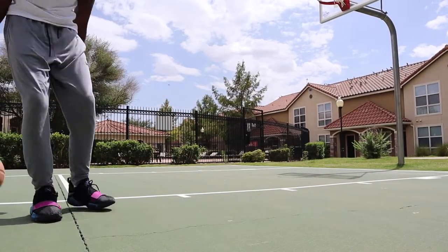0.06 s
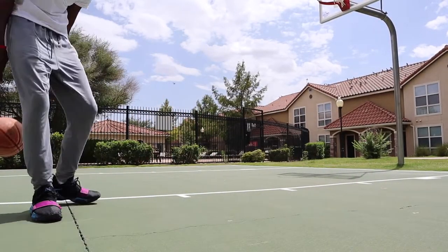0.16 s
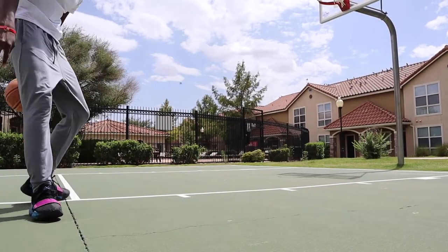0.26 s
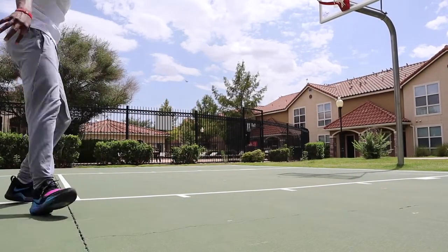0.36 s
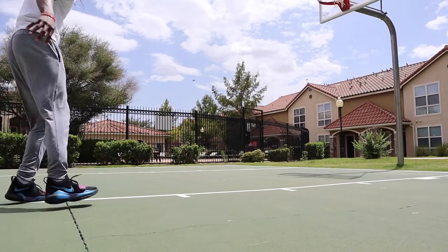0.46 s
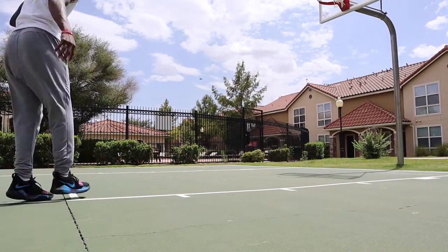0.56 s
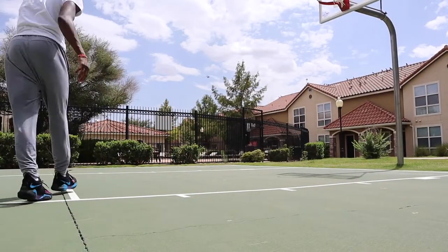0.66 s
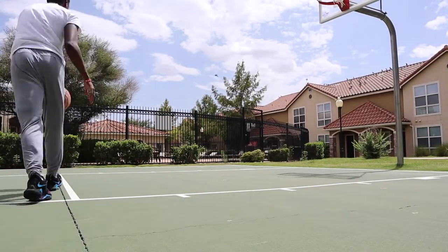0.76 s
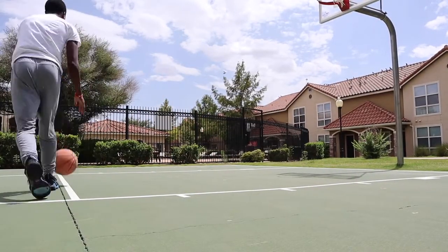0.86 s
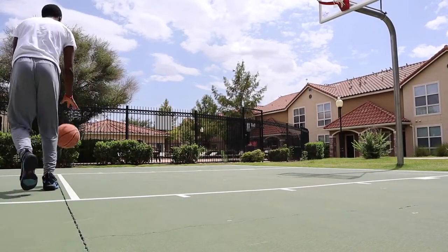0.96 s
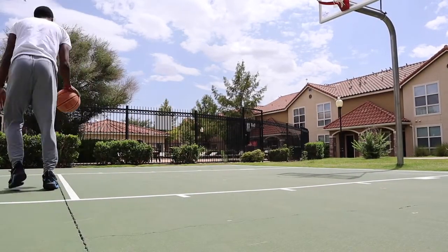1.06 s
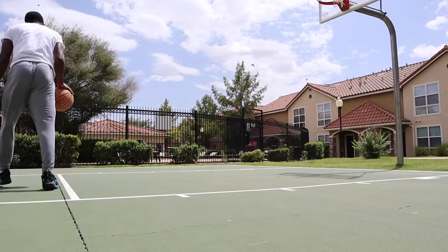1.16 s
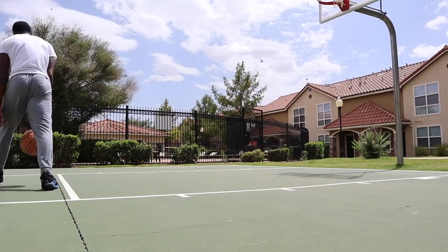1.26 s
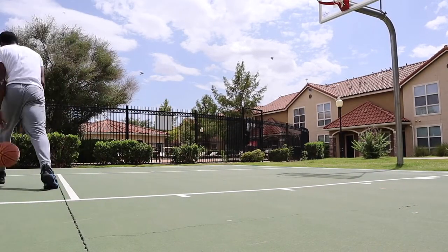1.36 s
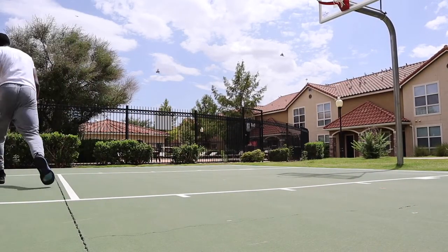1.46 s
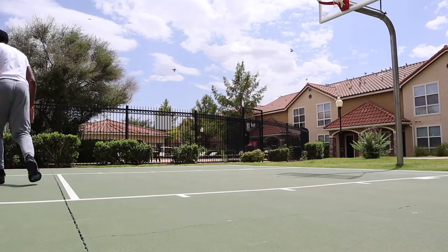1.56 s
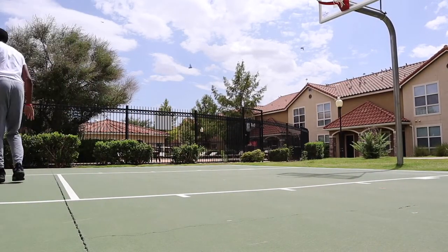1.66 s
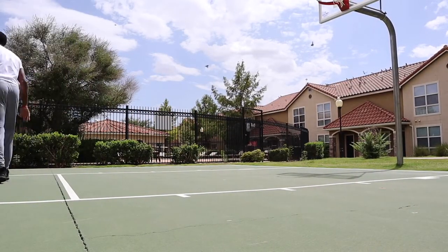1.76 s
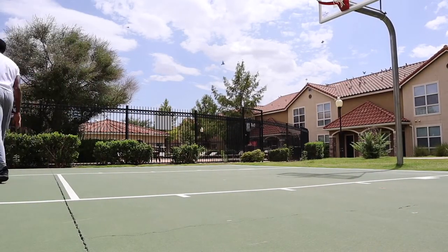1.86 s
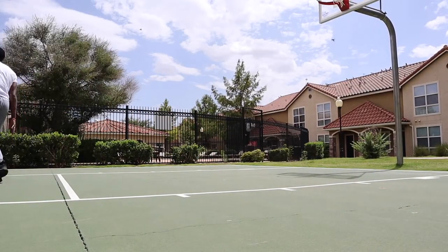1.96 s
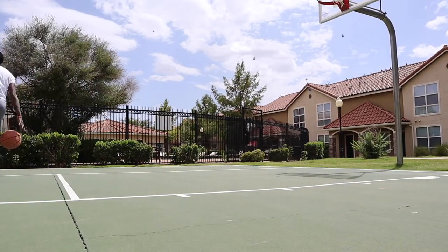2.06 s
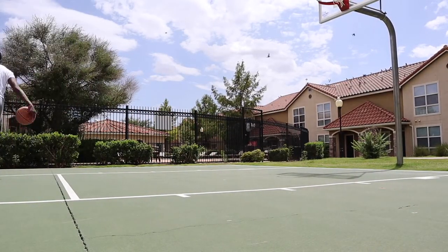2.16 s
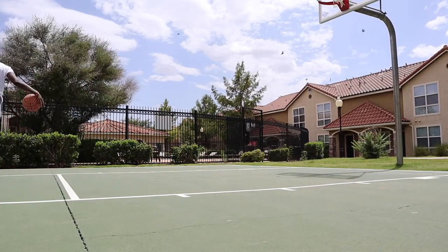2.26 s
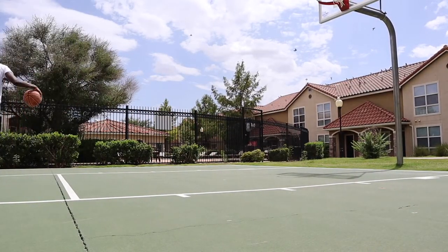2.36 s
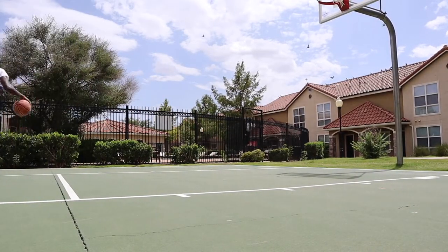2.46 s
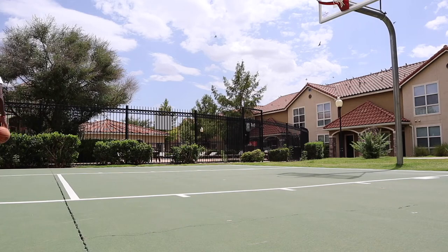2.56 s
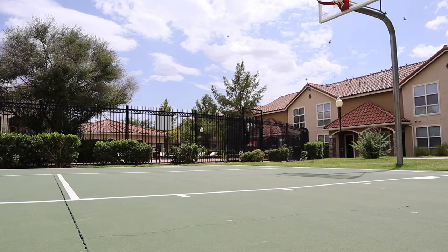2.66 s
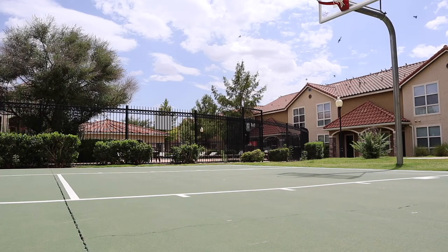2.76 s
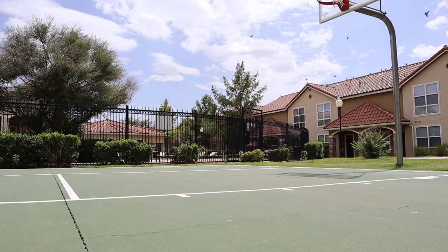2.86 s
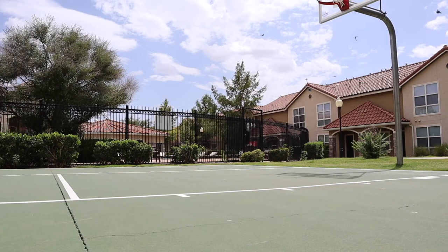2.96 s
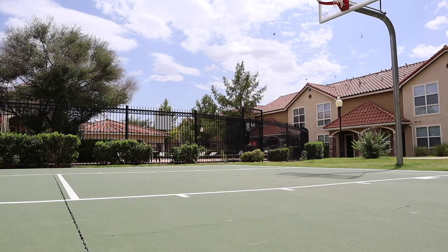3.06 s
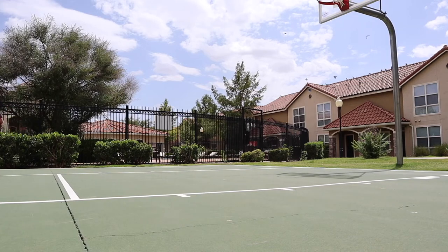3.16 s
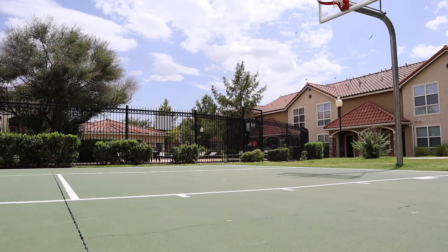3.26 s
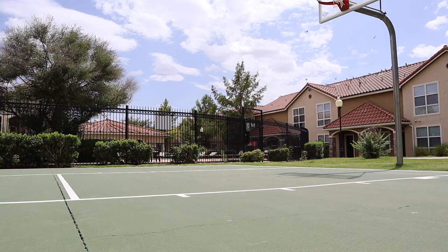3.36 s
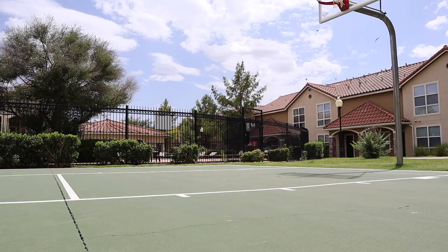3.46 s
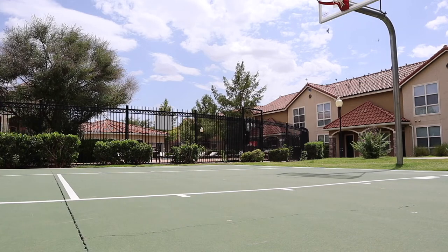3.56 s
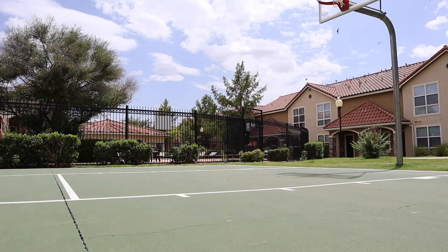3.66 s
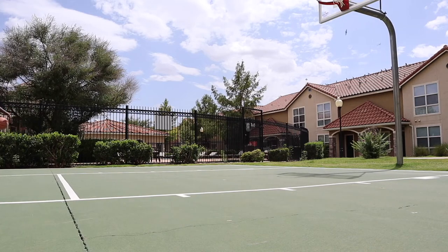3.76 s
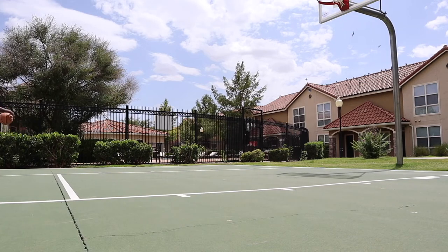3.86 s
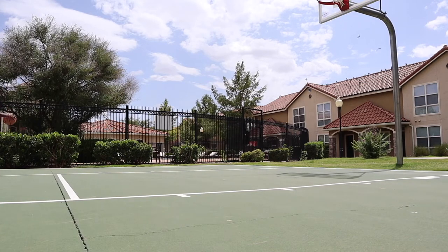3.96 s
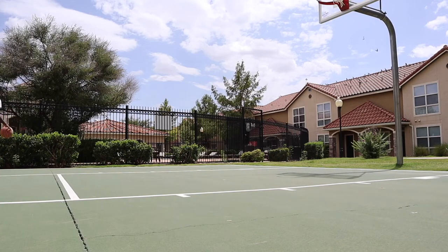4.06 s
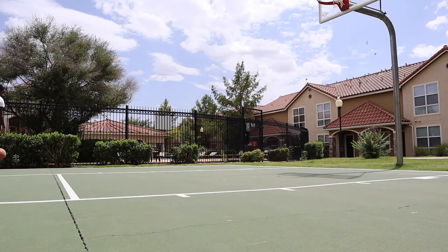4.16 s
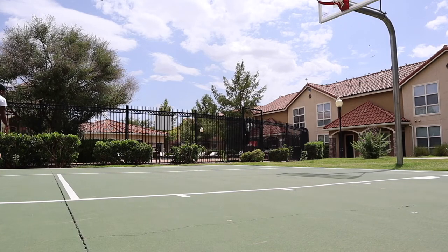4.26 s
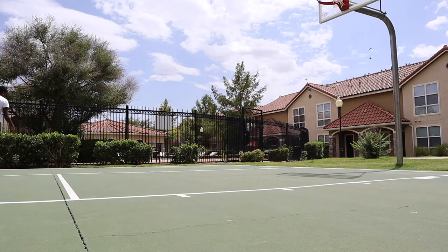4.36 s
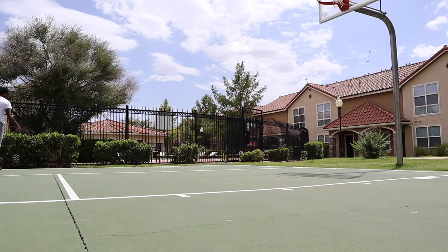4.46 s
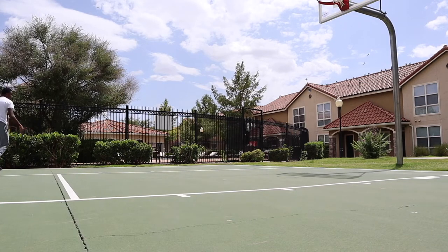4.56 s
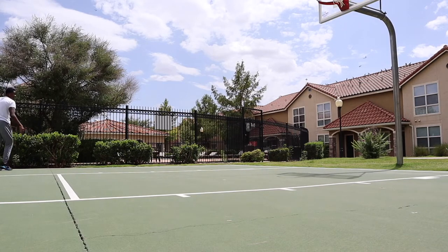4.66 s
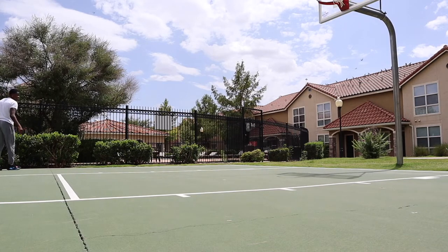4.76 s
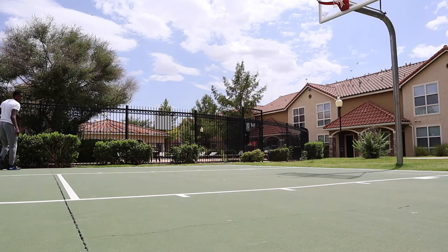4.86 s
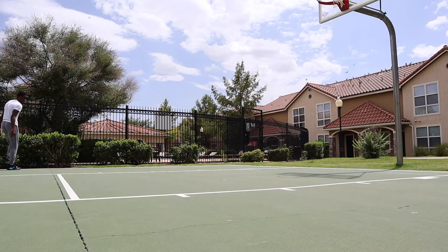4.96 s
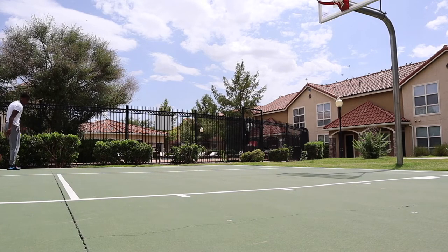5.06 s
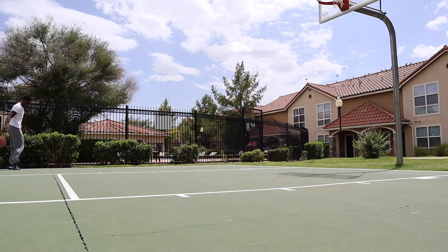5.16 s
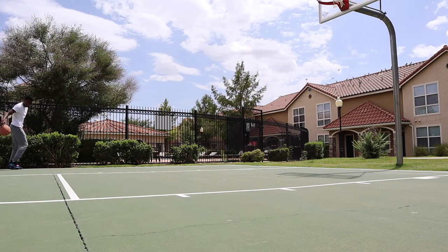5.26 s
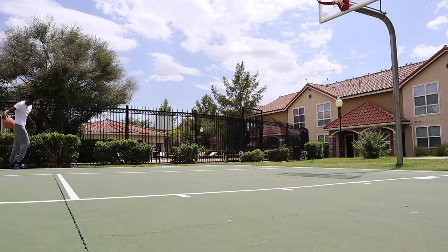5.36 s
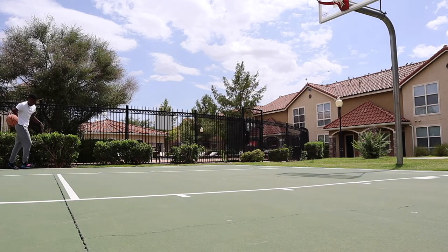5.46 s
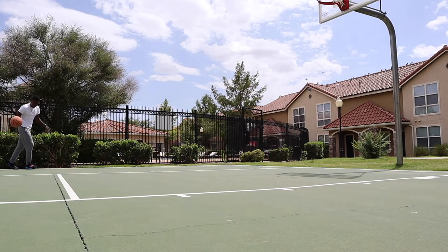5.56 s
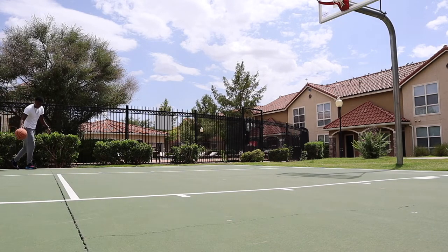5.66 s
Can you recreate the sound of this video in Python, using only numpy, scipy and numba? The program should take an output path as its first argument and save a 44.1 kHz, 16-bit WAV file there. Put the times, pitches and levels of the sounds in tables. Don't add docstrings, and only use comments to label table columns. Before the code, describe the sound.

A basketball is dribbled on an outdoor hard court, close to a small stereo camera microphone at first, then moving off. Eight sharp cracks with hollow, ringing thumps come well under a second apart, the loudest slightly clipped. Short gritty shoe scuffs fall between them, and dull echoes return from fence and houses. Cooling units hum low and waver under a bed of air and distant traffic.

```python
import sys
import numpy as np
from scipy import signal
from scipy.fft import rfft, irfft
from scipy.io import wavfile
from scipy.ndimage import uniform_filter1d, minimum_filter1d, map_coordinates
from numba import njit

SR = 44100
rng = np.random.default_rng(int(sys.argv[2]) if len(sys.argv) > 2 else 0)


def persist_wave(psi):
    counts = np.round(np.clip(psi, -1, 1) * 32767).astype(np.int16)
    wavfile.write(sys.argv[1], SR, np.atleast_2d(counts).T)


def boost_factor(decibels):
    exponent = np.asarray(decibels, float) / 20
    return 10 ** exponent


N = 252252
TIME = np.arange(N) / SR
BLOW = np.arange(1400) / SR
TAIL = np.arange(9000) / SR

# (multiple of shaft speed, level over the rush [dB])
FAN_ORDERS = [(2, 1), (10, -14), (20, -14.5), (25, -12.5), (30, -16)]
# (multiple of motor hum, level over the rush [dB])
MOTOR_HARMONICS = [(1, 5), (3, -14.5), (6, -13), (9, -15)]
# (time [s], lag [turns], strength share [0-1])
MOTOR_SLIP = [
    (0.15, 0.01, .6),
    (0.7, 0.95, .3),
    (1.75, 3.2, 0.2),
    (2.3, 3.98, .75),
    (2.78, 5, 1),
    (3.15, 5.74, 0.15),
    (4.55, 9.01, 0.8),
    (5.3, 10, 0.35),
    (5.72, 10.6, .6),
]
# (time [s], level [dB])
FAN_THROB = [(0, -30.5), (.55, -34.5), (.85, -30.5), (1.55, -34.5), (2.3, -29), (2.62, -38.5), (2.95, -28),
             (3.5, -25.5), (4.17, -35), (4.55, -25.5), (4.92, -34), (5.08, -24), (5.3, -32.5), (5.53, -21),
             (5.72, -29)]
# (frequency [Hz], density [dB per Hz])
RUSH_SPECTRUM = [(28, -23.5), (45, -7.5), (105, -5.5), (170, -5), (260, -8), (520, -11.5), (900, -14.5),
                 (1300, -12.5), (2000, -19), (3000, -23), (5000, -26.5), (8000, -34), (12000, -39),
                 (14500, -50)]
# (time [s], strength [dB], thump [Hz], air ring [Hz], brightness [dB])
BOUNCES = [
    (0.1245, 0, 231, 1254, 0),
    (0.9291, -.5, 184, 1510, 4.5),
    (1.3654, -1, 146, 1214, 6.5),
    (2.016, -2.5, 215, 1205, 1.5),
    (2.712, -3, 193, 1310, -3),
    (3.546, -3.5, 213, 1134, -3),
    (4.2709, -2, 219.5, 1790, -5.5),
    (5.0822, -4.5, 133, 980, 0.5),
]
# (ratio to the ring, level [dB], 60 dB decay [s])
AIR_MODES = [(.55, -7, 0.013), (1.002, 2, 0.016), (1.3, -1.5, 0.013), (1.65, -2.5, 0.013),
             (2.199, -6.5, 0.01), (2.85, -9.5, 0.01), (3.7, -5.5, .007), (4.6, -6.5, 0.0094)]
# (time [s], length [s], start band [Hz], end band [Hz], level [dB])
SCUFFS = [
    (0.348, 0.081, 7300, 5000, -44),
    (0.735, 0.018, 6060, 5000, -42),
    (0.795, 0.056, 11000, 6470, -41.5),
    (0.964, .04, 5000, 5200, -39),
    (2.22, .025, 10800, 10160, -50.5),
    (3.553, 0.042, 8000, 6500, -36.5),
    (3.919, 0.02, 8950, 8000, -44),
    (4.269, 0.039, 8000, 7150, -40),
    (4.772, 0.043, 11000, 9900, -63),
]
# (frequency [Hz], phase [radians])
PORT_LAG = [(60, 0), (430, 0.27), (860, 1.02), (1120, 1.5), (2580, 2), (3620, 3), (7000, 3.0), (13500, 3.2)]
# (frequency [Hz], left minus right [dB])
PORT_SHADE = [(60, 0.0), (110, 0.0), (200, 1.0), (380, 1.5), (700, 4.5), (1290, 6), (2380, 1), (4400, 4),
              (8120, 0), (15000, 1)]

SHAFT_HZ, MOTOR_HZ = 27.24, 204.7
THIRD_DB = -0.5
BLADE_DB, PAIR_DB = 5, -1.5
SWELL_DB, SWELL_HZ, SWELL_TOP_S = 1.7, 0.29, 0.9
RUSH_DB, CREEP_DB_PER_S, KNOCK_DB, RECOVER_S = -32, 0.81, -2.5, 0.82
STIFF_HZ, CONTACT_S = 200, 0.0105
TROUGH_MS, TROUGH_MS_PER_HZ = 4.8, 0.0096
DIP_DB, SLAP_DB, LIFT_DB_PER_HZ = -7.5, -8.5, -0.0331
CRACK_DB, RING_DB, RING_DB_PER_S = -1, -4, -1.06
ECHO_MS, ECHO_MS_PER_S, ECHO_DB = 46, -0.65, -12
MIC_LOW_HZ = 28.4
TREBLE_JITTER = np.repeat(rng.standard_normal((2, 32, N // 2048 + 2)), 2, axis=2)
CIRCUIT = rng.standard_normal(N)


def level(x, db):
    return x * boost_factor(db) / np.sqrt(np.mean(x ** 2))


def walk(rate):
    k = int(SR / rate)
    steps = np.repeat(rng.standard_normal(N // k + 1), k)
    return 1.274 * uniform_filter1d(uniform_filter1d(steps, k), k)[:N]


def band(x, lo_hz, hi_hz):
    return signal.sosfilt(signal.butter(2, [lo_hz, min(hi_hz, 0.45 * SR)], "band", fs=SR, output="sos"), x)


def pole(x, hz, kind):
    return signal.lfilter(*signal.butter(1, hz, kind, fs=SR), x)


def add(out, s, sound):
    i = int(s * SR)
    out[i:i + len(sound)] += sound[:N - i]


def curve(table):
    hz, value = np.transpose(table)
    return np.interp(np.log(np.fft.rfftfreq(N, 1 / SR) + 1), np.log(hz), value)


def machine_tone(hz, db):
    phase = np.cumsum(hz * (1 + 0.00054 * walk(1.984))) / SR + rng.random()
    return np.sqrt(2) * boost_factor(db + 0.8 * walk(14)) * np.sin(2 * np.pi * phase)


def rush():
    noise = irfft(rfft(rng.standard_normal(N)) * boost_factor(curve(RUSH_SPECTRUM)), N)
    return level(noise, 4.47) * boost_factor(0.5 * walk(14))


def rush_level():
    since = TIME - np.array(BOUNCES)[:, :1]
    knocks = np.sum((since > 0) * np.exp(-np.abs(since) / RECOVER_S), axis=0)
    return boost_factor(RUSH_DB + CREEP_DB_PER_S * TIME + KNOCK_DB * knocks)


def cooling_units(rush_gain):
    fan = sum(machine_tone(k * SHAFT_HZ, db) for k, db in FAN_ORDERS)
    motor = sum(machine_tone(k * MOTOR_HZ, db) for k, db in MOTOR_HARMONICS)
    s, turns, share = np.transpose(MOTOR_SLIP)
    twin = np.interp(TIME, s, share) * np.exp(2j * np.pi * np.interp(TIME, s, turns))
    pair = np.abs(1 - twin) * machine_tone(2 * MOTOR_HZ, PAIR_DB)
    swell_db = SWELL_DB * np.cos(2 * np.pi * SWELL_HZ * (TIME - SWELL_TOP_S))
    blades = machine_tone(5 * SHAFT_HZ, BLADE_DB + swell_db)
    throb_db = np.interp(TIME, *np.transpose(FAN_THROB))
    throb = machine_tone(3 * SHAFT_HZ, THIRD_DB + throb_db)
    return rush_gain * (fan + motor + blades + pair) + throb


def crack(ring_hz, ring_db, bright_db, chance):
    rings = 0
    for (ratio, db, t60), (db_luck, hz_luck) in zip(AIR_MODES, chance):
        mode = np.sin(2 * np.pi * ring_hz * ratio * (1 + 0.059 * hz_luck) * BLOW)
        rings = rings + boost_factor(db + 2.4 * db_luck) * mode * np.exp(-np.log(1000) * BLOW / t60)
    click = -np.sin(2 * np.pi * 3200 * BLOW) * np.exp(-BLOW / 0.00042)
    click = click - 0.45 * np.sin(2 * np.pi * 4200 * BLOW) * np.exp(-((BLOW - 0.0005) / 0.0001) ** 2)
    grit = band(rng.standard_normal(len(BLOW)), 1600, 15000) * np.exp(-BLOW / 0.0022)
    top_hz = min(9000 * boost_factor(2.1 * bright_db), 0.4 * SR)
    snap = pole(boost_factor(7) * click + boost_factor(-5) * grit, top_hz, "low")
    return snap + boost_factor(ring_db + 1.76) * rings


def squash_thump(hz, thump_db, lag_ms, dip_db):
    squash = np.exp(-((BLOW - lag_ms * 0.001 - 0.001) / 0.0031) ** 2)
    swing = np.cos(2 * np.pi * hz * (BLOW - lag_ms * 0.000997))
    swing = swing + 0.1 * np.cos(3 * np.arccos(swing))
    lift = np.maximum(BLOW - CONTACT_S, 0)
    suction = np.sin(2 * np.pi * 130 * lift) * np.exp(-lift / 0.0023)
    return -boost_factor(thump_db) * squash * swing - boost_factor(dip_db + 5.5) * suction


def court(hits):
    near = band(rng.standard_normal(len(TAIL)), 360, 2500) * np.exp(-TAIL / 0.0047) * boost_factor(-51.5)
    far = band(rng.standard_normal(len(TAIL)), 110, 760) * np.exp(-TAIL / 0.032) * (TAIL > 0.055) * boost_factor(-46.5)
    return hits + signal.fftconvolve(hits, near + far)[:N]


def ball():
    out = np.zeros(N)
    chance = rng.standard_normal((len(BOUNCES), 2, len(AIR_MODES), 2))
    for (s, thump_db, hz, ring_hz, bright_db), (hit_luck, slap_luck) in zip(BOUNCES, chance):
        lag_ms = TROUGH_MS + TROUGH_MS_PER_HZ * (hz - STIFF_HZ)
        lift_db = LIFT_DB_PER_HZ * (hz - STIFF_HZ)
        crack_db, ring_db = thump_db + CRACK_DB, RING_DB + RING_DB_PER_S * s
        thump = squash_thump(hz, thump_db, lag_ms, DIP_DB + lift_db)
        add(out, s, thump + boost_factor(crack_db) * crack(ring_hz, ring_db, bright_db, hit_luck))
        slap = pole(crack(ring_hz, ring_db, bright_db, slap_luck), 1800, "low")
        add(out, s + CONTACT_S, boost_factor(crack_db + SLAP_DB + lift_db) * slap)
        add(out, s + (ECHO_MS + ECHO_MS_PER_S * s) / 1000, boost_factor(ECHO_DB) * thump)
    return court(out)


def shoes():
    out = np.zeros(N)
    for s, length, from_hz, to_hz, db in SCUFFS:
        n = int(length * SR)
        u = np.arange(n) / n
        grit = rng.standard_normal((4000, 2))[:n].T
        start = band(grit[0], from_hz / 1.8, from_hz)
        end = band(grit[1], to_hz / 3.4, to_hz * 1.38)
        sole = (1 - u) * start + u * end
        add(out, s, level(sole * np.sin(np.pi * u ** 0.66), db))
    return out


def ports(left):
    turn = boost_factor(-curve(PORT_SHADE)) * np.exp(-1j * curve(PORT_LAG))
    return np.array([left, irfft(rfft(left) * turn, N)])


def scene():
    rush_gain = rush_level()
    tones = cooling_units(rush_gain)
    soles = shoes()
    around = np.array([boost_factor(-7) * band(rush(), 434, 2100) + boost_factor(-9.5) * pole(rush(), 2700, "high")
                       for ear in "LR"])
    front = ports(tones + rush_gain * rush() + pole(ball(), MIC_LOW_HZ, "high") + soles)
    return front + rush_gain * around + boost_factor(-9.5) * soles


@njit
def follow(x, attack, release):
    e, out = 0., np.empty(len(x))
    for i in range(len(x)):
        e += (x[i] - e) * (attack if x[i] > e else release)
        out[i] = e
    return out


def limiter(x):
    peak = follow(np.abs(x).max(axis=0), 1 / (0.0057 * SR), 1 / (0.025 * SR))
    gain = np.minimum(boost_factor(-13.5) / (peak + 1e-9), 1) ** 0.71
    gain = map_coordinates(gain, [np.arange(N) - 0.0085 * SR], order=1, mode="nearest")
    return np.clip(x * gain, -1, 1)


def sparse_treble(x, from_hz, floor_db, tilt_db, jitter_db, size=32):
    hz, _, z = signal.stft(np.pad(x, (0, 2048), "reflect"), SR, nperseg=2048)
    hz, z = hz[:-1], z[:-1]
    power = np.mean(np.abs(z.reshape(-1, size, z.shape[1])) ** 2, axis=1)
    power_db = 10 * np.log10(power + 1e-20)
    middle_db = minimum_filter1d(np.median(power_db[2:8], axis=0), size=5)
    start_hz = hz[::size, None] + 1
    floor = middle_db + floor_db + tilt_db * np.log2(start_hz / from_hz) + jitter_db[:, :z.shape[1]]
    kept = z * np.repeat((power_db > floor) | (start_hz < from_hz), size, axis=0)
    strong = 20 * np.log10(np.abs(z) + 1e-20) > np.repeat(floor, size, axis=0) + 3.5
    kept = kept * (strong | (hz[:, None] < from_hz + size * hz[1]))
    return signal.istft(np.r_[kept, 0 * z[:1]], SR, nperseg=2048)[1][:N]


def roll_off(x):
    return signal.sosfilt(signal.butter(12, 17580, fs=SR, output="sos"), x)


def record(dry):
    left, right = limiter(dry)
    mid = sparse_treble((left + right) / 2, 5300, -6.5, tilt_db=-4.5, jitter_db=4.2 * TREBLE_JITTER[0])
    side = sparse_treble((left - right) / 2, 12000, -20.5, tilt_db=10, jitter_db=3.2 * TREBLE_JITTER[1])
    side = side + level(band(band(CIRCUIT, 14850, 15100), 14850, 15100), -80)
    mix = np.clip(np.array([mid + side, mid - side]), -1, 1)
    return roll_off(mix)


dry = scene()
out = record(dry)
persist_wave(out)
```